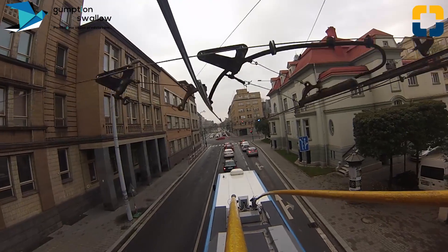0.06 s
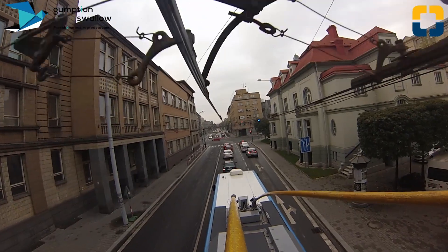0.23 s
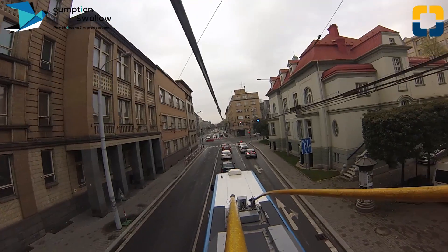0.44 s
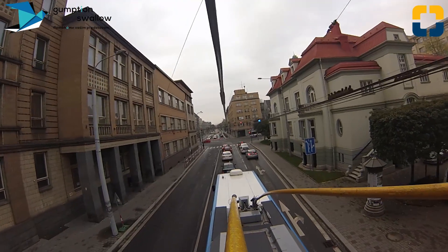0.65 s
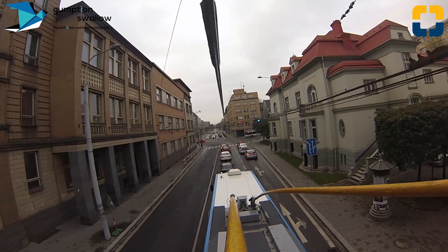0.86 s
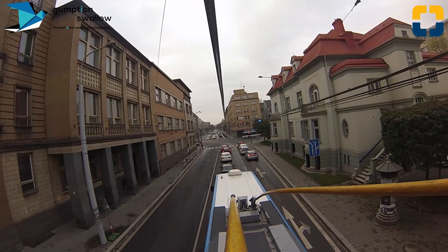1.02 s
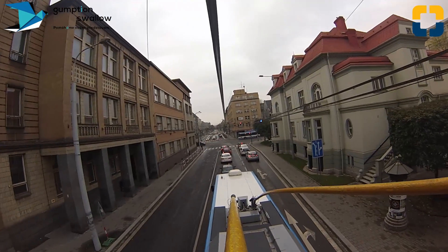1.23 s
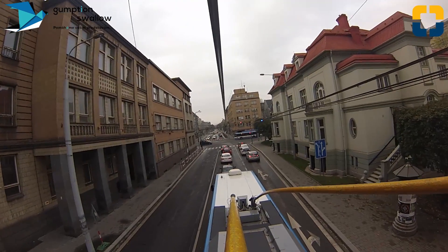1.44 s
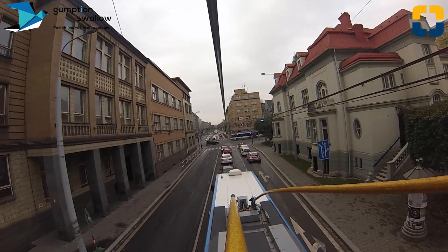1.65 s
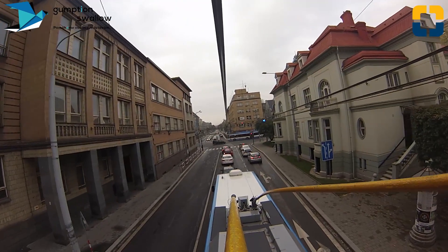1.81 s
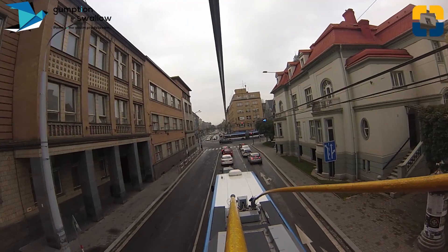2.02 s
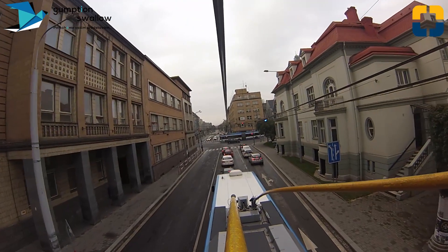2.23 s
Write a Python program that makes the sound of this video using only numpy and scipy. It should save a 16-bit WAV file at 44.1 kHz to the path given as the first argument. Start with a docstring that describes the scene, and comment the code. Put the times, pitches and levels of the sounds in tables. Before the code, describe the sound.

Metal clacks and ringing knocks of a trolleybus pole passing wire fittings, then only low shuddering rumble

```python
"""Trolleybus shoe on overhead wire

A collector shoe slides along the wire and knocks through a set of fittings, heard from the pole.
Slide: fluttering shaped noise; rumble: a wavering low sine that swells and fades over road noise.
Knocks send bending waves to and fro along the metal: treble returns first, so echoes are falling chirps.
Loose parts clack (filtered contacts), the shoe clangs once (decaying modes), with cracks and squeaks."""
import sys
import numpy as np
from scipy import signal
from scipy.fft import rfft, irfft
from scipy.io import wavfile

SR = 44100
rng = np.random.default_rng(int(sys.argv[2]) if len(sys.argv) > 2 else 0)


def unload_audio(sound):
    """Save the sound as a 16-bit wav file, at the path given as the first command line argument."""
    columns = np.transpose(np.atleast_2d(sound))
    # keep every value between -1 and 1, then stretch to whole-number steps
    steps = np.round(np.clip(columns, -1, 1) * 32767)
    wavfile.write(sys.argv[1], SR, steps.astype(np.int16))


N = 100062
SIZE = 2 ** 18  # FFT length
HZ, T = np.fft.rfftfreq(SIZE, 1 / SR), np.arange(N) / SR

# hiss spectrum of the sliding shoe: f/Hz, relative density/dB
SLIDE_SPECTRUM = [(130, -24), (190, 0), (300, -11.5), (386, -44.5), (940, -35), (1230, -22.5),
                  (1660, -34.5), (2050, -19), (2900, -40), (3800, -29), (4150, -40.5), (7300, -51.5),
                  (8200, -53.5), (11800, -56), (12500, -79.5)]
# pole ringing as the shoe rubs along: t/s, level/dB
RUB_LEVEL = [(0, -38.5), (.17, -46), (.33, -50.5), (.52, -55.5), (.57, -42), (.86, -42.5), (1.0, -47.5),
             (1.4, -49), (1.85, -57), (2.27, -65.5)]
# pole resonance, for rubbing and knocks: f/Hz, relative level/dB
POLE_SPECTRUM = [(60, -48.5), (100, -20), (146, -20), (177, 0), (215, -12.5), (254, -3), (274, -0.5),
                 (305, -7), (350, -19), (500, -19.5), (600, -23.5), (700, -21), (790, -16.5), (874, -27),
                 (956, -15), (1110, -27.5), (1230, -18), (1420, -19.5), (1640, -38.5), (1970, -21),
                 (2250, -39), (2450, -31), (2910, -61), (3700, -52.5), (4740, -70.5), (7500, -73.5),
                 (10000, -101)]
SLIDE_DB = -54.5
FLUTTER_DB, FLUTTER_SMOOTH_HZ, FLUTTER_RATE_HZ = 5, 112, 22  # depth, smoothing across bands, speed
FLUTTER_TOP_HZ = 4500  # depth halves here; smoother above

# pole shudder: t/s, level/dB before SHUDDER_GAIN_DB
SHUDDER_LEVEL = [(0, -40.5), (.27, -40.5), (.35, -32), (.44, -50), (.49, -37), (.64, -42.5), (.75, -32),
                 (.85, -49), (1.02, -47), (1.06, -30.5), (1.12, -46), (1.4, -36), (1.48, -49.5),
                 (1.68, -37), (1.79, -47), (1.89, -31), (2.0, -42.5), (2.1, -45.5), (2.19, -33),
                 (2.27, -49)]
SHUDDER_HZ, SHUDDER_WANDER_HZ, SHUDDER_GAIN_DB = 45.65, 1.7, 1
# road noise spectrum: f/Hz, relative density/dB
ROAD_SPECTRUM = [(10, -18), (25, 3), (50, -6.5), (62, -7.5), (160, -13), (300, -48), (1000, -74.5)]
ROAD_MID_DB, ROAD_FADE_DB_PER_S = -51, 5  # level at mid-scene, steady fade

# clacks of loose parts: t/s, level/dB, bass/dB, treble/dB
CLACK_EVENTS = [(.0065, -21, 3.5, -9.5), (.0735, -30, -17, -12.5), (0.203, -28.5, 15, -18),
                (0.4841, -26, -8, -15), (.572, -43.5, 12, -10), (0.707, -22.5, 13.5, 6.5),
                (1.128, -27, -12, -11)]
# loose-part resonance: f/Hz, relative level/dB
CLACK_SPECTRUM = [(100, -17.5), (400, -12.5), (600, -1.5), (950, 3), (1400, 2.5), (1700, -10.5),
                  (2200, -4.5), (2900, -34), (3700, -28), (4400, -43), (5500, -56), (9000, -85)]
CLACK_RATTLE_S, CLACK_RATTLE_DB = 0.015, -1
REBOUND_S, REBOUND_DB = 0.0102, -9.5  # a loose part falls back once

# knocks into the pole: t/s, level/dB before tone, bass/dB, treble/dB, echo send/dB before ECHO_DB
KNOCK_EVENTS = [(0.037, -36, 9.5, -6, -5), (0.097, -34.5, 5.5, -14.5, -6.5), (.203, -47, -9.5, 9, 7),
                (.209, -31, 2.5, -5, -14.5), (0.531, -33, -11, -2.5, -25.5), (.551, -39, 9.5, -10, -21.5),
                (0.571, -29.5, 4.5, -2.5, -26), (0.581, -34.5, 11.5, -2.5, -12),
                (.592, -37.5, -11.5, 3, -18.5), (0.6126, -28.5, -8.5, 6, -21.5),
                (.635, -40.5, -11, 9.5, -26), (0.7076, -18.5, -7.5, 1, -12.5),
                (.762, -24.5, 6.5, 3.5, -9.5), (1.060, -21, 7, 4, 0.5), (1.068, -25, 13, -5, -31.5),
                (1.1653, -29, 1.5, 12, -9.5)]
KNOCK_RATTLE_S, KNOCK_RATTLE_DB = 0.011, 0.5
BASS_HZ, TREBLE_HZ = 427, 1520  # shelf corners of a blow

ECHO_DB = -2
TRIP_AT_HZ, ROUND_TRIP_S = 1000, 0.0494  # travel time along the metal and back, at TRIP_AT_HZ
# gain of each further round trip: f/Hz, gain/dB
TRIP_GAIN = [(250, -7), (1000, -2), (4000, -5.5)]
# far-end reflectors: extra travel t/s at TRIP_AT_HZ, level/dB before ECHO_DB
FAR_REFLECTORS = [(.0004, 0.5), (.0033, -4.5), (.013, -1), (.021, -6)]
# share the reflections return: f/Hz, gain/dB
RETURN_GAIN = [(100, -2.5), (190, -2), (290, 0), (380, -9), (1000, 1), (1500, -9.5), (4000, 10),
               (6000, -20)]
BLUR_S, BLUR_DB = 0.0056, -14  # the joints smear each return
# share scattered on the way: f/Hz, gain/dB before SCATTER_DB
SCATTER_GAIN = [(120, -14), (190, 2.5), (650, 0), (1000, 7), (4000, -14.5)]
# decay of scattered waves, on the warped delay axis: f/Hz, t60/s
SCATTER_DECAY = [(250, 1.1), (1000, 2.84), (2200, 0.51), (4000, 0.67)]
SCATTER_DB, PATHS_PER_S = -2.5, 220  # level, density of scattered returns

# squeaks of the shoe on the wire: middle t/s, pitch f/Hz, level/dB
SQUEAK_EVENTS = [(.245, 2400, -54), (0.963, 2033, -51.5)]
SQUEAK_S, SQUEAK_WIDTH_HZ = 0.011, 110  # Gaussian half-width to 1/e, rms pitch deviation

# cracks of metal on metal: t/s, level/dB
CRACK_EVENTS = [(0.7073, -44.5), (1.0601, -37.5), (1.0735, -56), (1.170, -51.5)]
# crack colour: f/Hz, relative level/dB
CRACK_SPECTRUM = [(500, -30), (3700, 11.5), (4400, -2.5), (7700, -28.5), (12000, -33)]
CRACK_RATTLE_S, CRACK_RATTLE_DB = 0.004, -2

# shoe chatter over the hardest fitting: t/s, ring level/dB, scrape level/dB
CLANG_BOUNCES = [(0.7455, -26.5, -51), (.7488, -15, -31.5), (.7550, -23.5, -37.5), (0.7621, -27, -31)]
# shoe modes: f/Hz, relative level/dB, t60/s
SHOE_MODES = [(535, -12, 0.08), (775, 4, 0.081), (1009, 15.5, 0.044), (1064, -10, 0.017),
              (1232, -10.5, 0.075), (1399.5, -9.5, 0.32), (1770, -18, 0.11), (2400, -16.5, 0.051),
              (3403, -22, 0.083), (3834, -12.5, 0.037), (4750, -26, 0.06)]
# scrape colour: f/Hz, relative level/dB
SCRAPE_SPECTRUM = [(1050, 6), (3000, -15), (3850, -24), (5250, -20), (6400, -40.5), (7600, -26),
                   (8100, -59)]
CLANG_RISE_S = 0.00083  # modes build up over the contact
SCRAPE_S, GRIT_DB = 0.0073, 2.5  # scrape length, spread of grain sizes

EDGE_HZ = 12100  # recorder band limit


def amp(db):
    """Decibels to gain."""
    return 10 ** (np.asarray(db) / 20)


def evened(x):
    """Scale to rms 1."""
    return x / np.sqrt(np.mean(x ** 2) + 1e-20)


def read(points):
    """Interpolate a spectrum table over log frequency onto HZ."""
    f, value = np.transpose(points)
    return np.interp(np.log(HZ + 1), np.log(f + 1), value)


def level(points):
    """Interpolate a dB curve to a gain per sample."""
    return amp(np.interp(T, *np.transpose(points)))


def add(mix, start_s, sound):
    """Mix a sound in at start_s, in place."""
    part = mix[max(round(start_s * SR), 0):][:len(sound)]
    part += sound[:len(part)]


def noise(points):
    """Steady noise of the given spectrum, rms 1."""
    spectrum = rfft(rng.standard_normal(SIZE)) * amp(read(points))
    return evened(irfft(spectrum)[:N])


def drift(hz):
    """Slow random curve, rms about 1, Gaussian low-pass at hz."""
    spectrum = rfft(rng.standard_normal(SIZE)) * np.exp(-(HZ / hz) ** 2)
    return evened(irfft(spectrum))[:N]


def ring(db, size=8192):
    """Minimum-phase (causal) impulse response of a dB spectrum."""
    log_gain = np.log(amp(np.maximum(db[::SIZE // size], -110)))
    circle = np.r_[log_gain, log_gain[-2:0:-1]]
    return np.fft.ifft(np.exp(np.conj(signal.hilbert(circle)))).real[:size // 2]


def shelves(bass_db, treble_db):
    """Tone of a blow: bass and treble shelves, dB on HZ."""
    bass = bass_db / (1 + (HZ / BASS_HZ) ** 6)
    treble = treble_db * (1 - 1 / (1 + (HZ / TREBLE_HZ) ** 6))
    return bass + treble


def contact(length_s, rattle_db):
    """Contact force: one sharp impulse plus a short noise rattle."""
    force = rng.standard_normal(SR // 10)[:int(length_s * SR)]
    force *= amp(rattle_db) / np.linalg.norm(force)
    force[0] += 1
    return force


def fluttering(x):
    """Bands swell and fade independently; neighbouring STFT bins share smoothed random gains."""
    hz, t, z = signal.stft(x, SR, nperseg=1024, noverlap=768)
    across = np.fft.fftfreq(len(hz), hz[1])[:, None]
    along = np.fft.fftfreq(len(t), t[1])
    smooth = np.exp(-(across * FLUTTER_SMOOTH_HZ) ** 2 - (along / FLUTTER_RATE_HZ) ** 2)
    patches = evened(np.fft.ifft2(np.fft.fft2(rng.standard_normal(z.shape)) * smooth).real)
    depth_db = FLUTTER_DB / (1 + (hz[:, None] / FLUTTER_TOP_HZ) ** 2)
    gain = amp(depth_db * patches)
    gain = gain / np.sqrt(np.mean(gain ** 2, 1, keepdims=True))  # rms gain 1 per band
    return signal.istft(z * gain, SR, nperseg=1024, noverlap=768)[1][:N]


def slide():
    """Friction: the shoe hisses unevenly along the wire and keeps the pole ringing."""
    hiss = amp(SLIDE_DB) * noise(SLIDE_SPECTRUM)
    rub = level(RUB_LEVEL) * noise(POLE_SPECTRUM)
    return fluttering(hiss + rub)


def rumble():
    """The pole shudders at one wavering low pitch, over road noise that slowly eases."""
    turns = np.cumsum(SHUDDER_HZ + SHUDDER_WANDER_HZ * drift(hz=6.4)) / SR
    shudder = amp(SHUDDER_GAIN_DB) * level(SHUDDER_LEVEL) * evened(np.sin(2 * np.pi * turns))
    road_db = ROAD_MID_DB - ROAD_FADE_DB_PER_S * (T - T.mean())
    return shudder + amp(road_db) * noise(ROAD_SPECTRUM)


def clacks():
    """Loose parts: short dry rattles through a resonance, each with one rebound."""
    out, body = np.zeros(N), read(CLACK_SPECTRUM)
    for s, db, bass_db, treble_db in CLACK_EVENTS:
        tick = ring(body + shelves(bass_db, treble_db))
        tick = amp(db) * tick / abs(tick).max()
        add(out, s, signal.fftconvolve(contact(CLACK_RATTLE_S, CLACK_RATTLE_DB), tick))
        add(out, s + REBOUND_S, amp(REBOUND_DB) * tick)
    return out


def round_trips(warped, count=10):
    """Spectrum of repeated reflections, each trip delayed and attenuated again."""
    trip = np.exp(-2j * np.pi * warped * ROUND_TRIP_S)
    far_end = sum(amp(ECHO_DB + db) * np.exp(-2j * np.pi * warped * s) for s, db in FAR_REFLECTORS)
    wave = trip * far_end
    again = trip * amp(np.minimum(read(TRIP_GAIN), 0))
    trips = 0
    for _ in range(count):
        trips, wave = trips + wave, wave * again
    return trips * rfft(contact(BLUR_S, BLUR_DB), SIZE)


def scattered(warped, size=16384):
    """Spectrum of sparse random returns, dispersed alike, with decay by band."""
    delay = np.arange(2 * size) / size
    paths = rng.standard_normal(len(delay))
    paths = paths * (rng.random(len(delay)) < PATHS_PER_S / size) * (delay > ROUND_TRIP_S)
    scatter = 0
    for k, (_, t60) in enumerate(SCATTER_DECAY):
        tail = paths * amp(-60 * delay / t60)
        band = read([(hz, j == k) for j, (hz, _) in enumerate(SCATTER_DECAY)])  # crossfaded bands
        spectrum = rfft(tail / np.linalg.norm(tail), SIZE)
        # reading at the warped frequency disperses the tail
        scatter = scatter + band * np.interp(warped, np.fft.rfftfreq(SIZE, 1 / size), spectrum, right=0)
    return scatter


def echoes():
    """Pole response to bending waves: travel time goes as 1 / sqrt(frequency)."""
    warped = 2 * np.sqrt(TRIP_AT_HZ * HZ)  # its slope over HZ is 1 at TRIP_AT_HZ
    returned = round_trips(warped) * amp(read(RETURN_GAIN))
    scatter = scattered(warped) * amp(SCATTER_DB + read(SCATTER_GAIN))
    return irfft(returned + scatter)[:N]


def knocks():
    """Fittings' blows ring the pole and come back as dispersed chirps."""
    direct, sent, body = np.zeros(N), np.zeros(N), read(POLE_SPECTRUM)
    peak = abs(ring(body)).max()
    for s, db, bass_db, treble_db, echo_db in KNOCK_EVENTS:
        force = contact(KNOCK_RATTLE_S, KNOCK_RATTLE_DB)
        response = ring(body + shelves(bass_db, treble_db))
        blow = amp(db) / peak * signal.fftconvolve(force, response)
        add(direct, s, blow)
        add(sent, s, amp(echo_db) * blow)
    return direct + signal.fftconvolve(sent, echoes())[:N]


def squeaks():
    """The shoe catches on the wire and sings for an instant: a sine of wavering pitch."""
    out = np.zeros(N)
    for s, hz, db in SQUEAK_EVENTS:
        turns = np.cumsum(hz + SQUEAK_WIDTH_HZ * drift(hz=302)) / SR
        swell = np.exp(-((T - s) / SQUEAK_S) ** 2)
        out += amp(db) * swell * evened(np.sin(2 * np.pi * turns))
    return out


def cracks():
    """The hardest contacts snap brightly: a contact through a treble-heavy response."""
    out, tick = np.zeros(N), ring(read(CRACK_SPECTRUM))
    tick = tick / abs(tick).max()
    for s, db in CRACK_EVENTS:
        add(out, s, amp(db) * signal.fftconvolve(contact(CRACK_RATTLE_S, CRACK_RATTLE_DB), tick))
    return out


def clang():
    """Quick bounces ring the shoe's decaying modes, each with a burst of gritty scraping."""
    out, t, tick = np.zeros(N), T[:SR // 5], ring(read(SCRAPE_SPECTRUM))
    tick = tick / np.linalg.norm(tick)
    modes = sum(amp(db - 60 * t / t60) * np.sin(2 * np.pi * hz * t) for hz, db, t60 in SHOE_MODES)
    modes *= 1 - np.exp(-(t / CLANG_RISE_S) ** 2)
    modes = modes / abs(modes).max()
    for s, db, scrape_db in CLANG_BOUNCES:
        hiss = rng.standard_normal(len(t))
        grain_db = GRIT_DB * np.minimum(rng.exponential(1, len(t)), 4)
        grit = evened(hiss * amp(grain_db)) * np.exp(-(t / SCRAPE_S) ** 4)
        add(out, s, amp(db) * modes)
        add(out, s, amp(scrape_db) * signal.fftconvolve(grit, tick))
    return out


def scene():
    """Sum of all sources at one microphone on the pole."""
    return (knocks() + clacks() + cracks() + clang() + squeaks() + slide() + rumble())[None]


def record(dry):
    """Recorder band limit: linear-phase low-pass."""
    lowpass = signal.firwin(511, EDGE_HZ, window=("kaiser", 9), fs=SR)
    return signal.oaconvolve(dry, lowpass[None], "same")


dry = scene()
out = record(dry)
unload_audio(out)
```